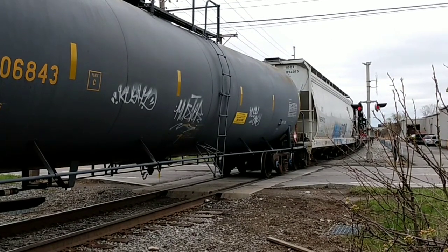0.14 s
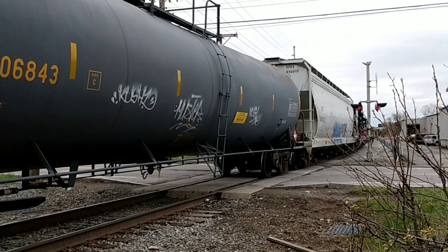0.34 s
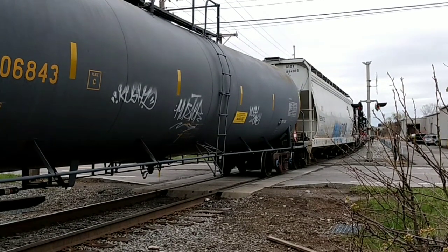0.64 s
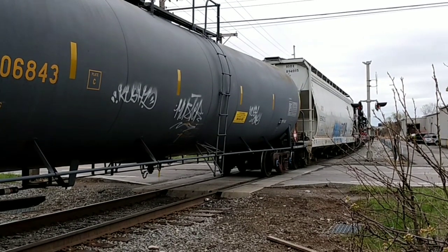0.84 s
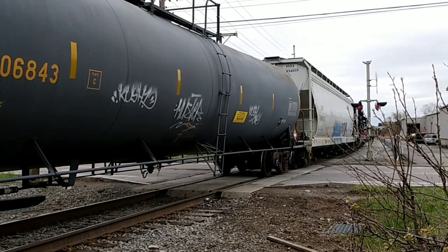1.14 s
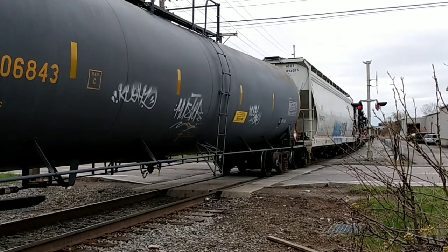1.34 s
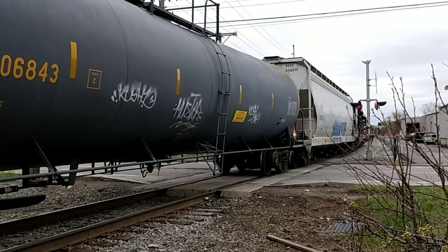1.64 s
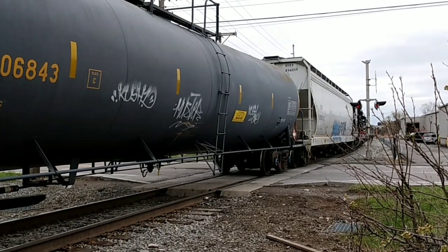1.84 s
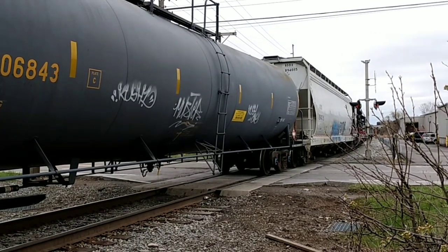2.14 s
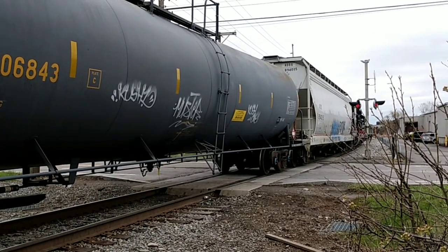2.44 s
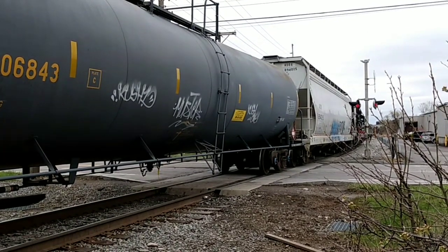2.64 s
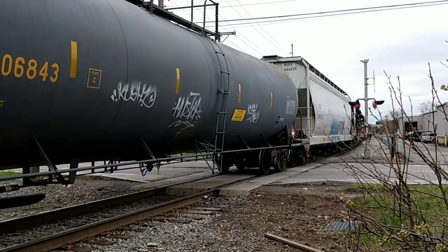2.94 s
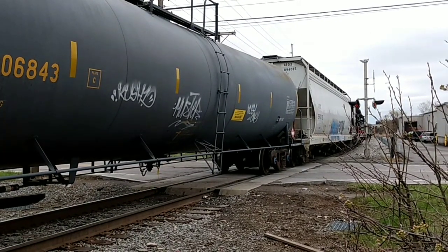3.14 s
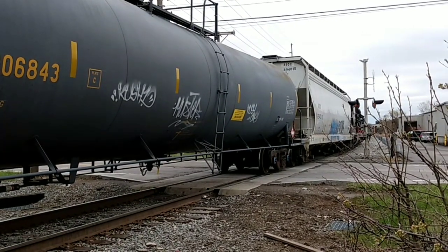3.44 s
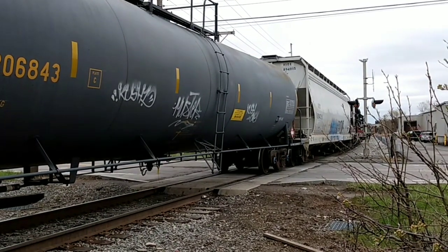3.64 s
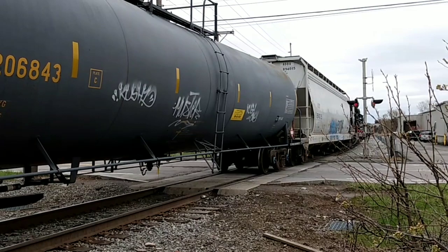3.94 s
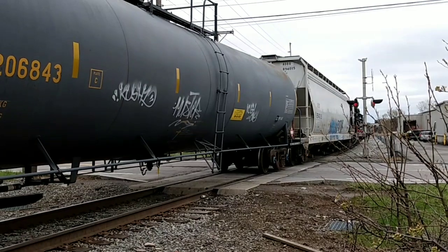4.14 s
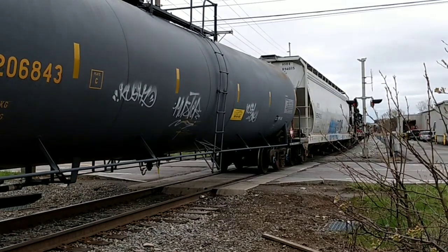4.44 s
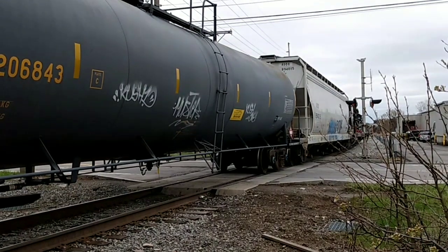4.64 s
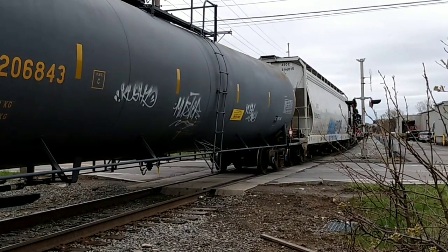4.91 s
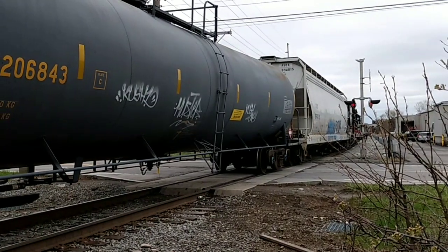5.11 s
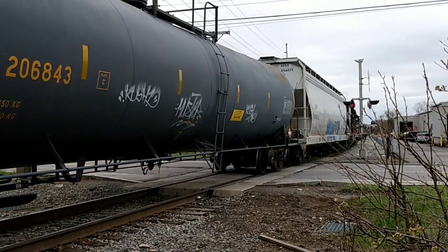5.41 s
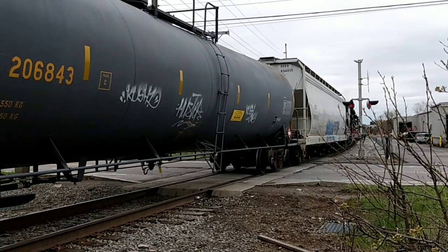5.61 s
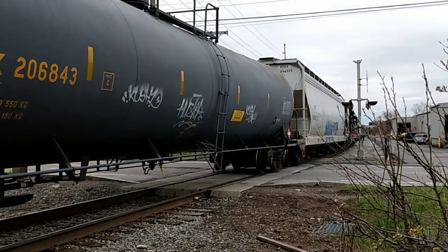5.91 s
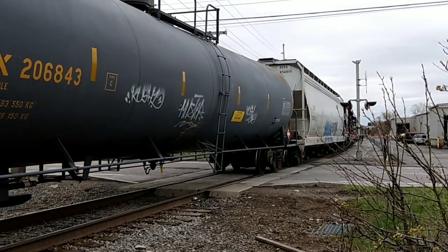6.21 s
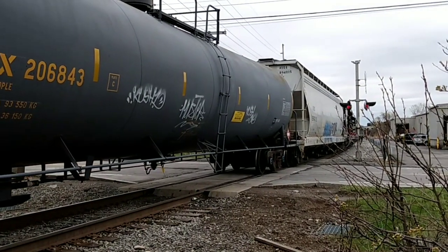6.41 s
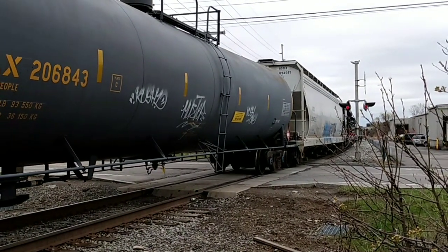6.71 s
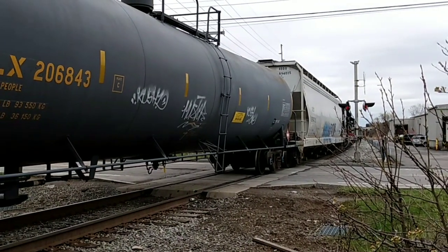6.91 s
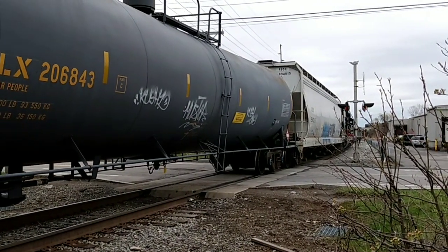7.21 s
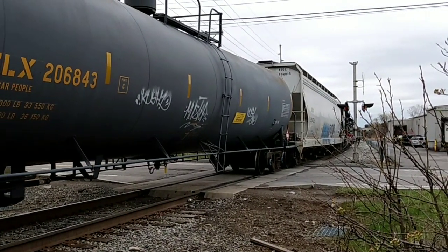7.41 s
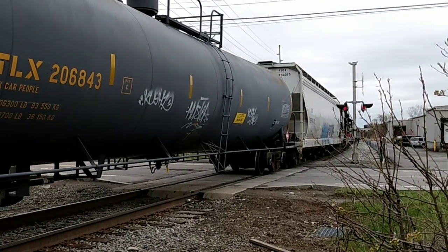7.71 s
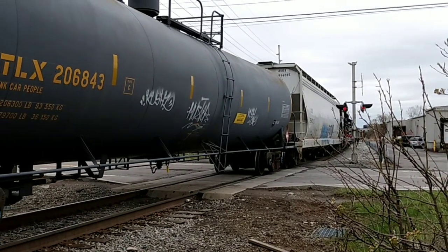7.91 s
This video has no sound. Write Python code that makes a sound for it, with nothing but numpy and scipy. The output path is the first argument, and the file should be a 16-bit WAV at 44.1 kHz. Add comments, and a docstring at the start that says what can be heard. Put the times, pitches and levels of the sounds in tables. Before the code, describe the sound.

Two bright bursts of brake air hiss one after the other and die away as a freight train prepares to move. Couplers clank and scrape, first in a short cluster, then in a louder run of metal crashes, brief squeaks, hollow booms and rumbling that echoes outdoors near the microphone. The cars settle into lighter knocks and a low roll, with a few wind puffs and a faint, wavering wheel tone.

```python
"""A freight train starts to roll beside a road crossing. First two brake valves vent in sharp, fading
hisses (0.3 s, 1.9 s) and their pipes ring on. From about 3 s the slack runs through the couplers:
steel grinds, crashes and chatters, rods clink, the empty tank booms and the yard echoes.
Crashes and rumble peak at 5-6 s. Last, among weaker jolts, wind flicks the left microphone port
and a wheel sings faintly."""
import sys
import numpy as np
from scipy import signal
from scipy.fft import rfft, irfft, next_fast_len
from scipy.io import wavfile
from scipy.ndimage import uniform_filter1d

SR = 44100
rng = np.random.default_rng(int(sys.argv[2]) if len(sys.argv) > 2 else 0)


def master_out(mix):
    """Clip the mix to full scale and print it as 16-bit PCM to the path in sys.argv[1]."""
    frames = np.transpose(np.atleast_2d(mix))
    ceiling = np.clip(frames, -1, 1)
    pcm = np.round(ceiling * 32767).astype(np.int16)
    wavfile.write(sys.argv[1], SR, pcm)


N = 355446

# brake valves: (start [s], opening [s], hiss [dB], fall [dB/s], nearly empty after [s])
VALVES = [(.256, 0.035, -19, 30.5, 1.04), (1.904, 0.036, -19.5, 32, 0.95)]
# coupler jolts: (time [s], rise [s], force [dB], car body [Hz], extra thud [dB], extra clang [dB],
# extra scrape [dB], ring time [ratio])
JOLTS = [(2.859, .11, -37, 350, -1, -2.5, 4, 0.86), (3.24, 0.052, -35.5, 337, 0, -3, -2.5, 0.77),
         (3.479, 0.035, -32, 198, -1.5, -5, -3.5, 0.78), (3.572, .025, -25.5, 163, -5, 2, -3.5, 0.72),
         (3.6, 0.08, -21.5, 170, 0.5, -0.5, 0, 1.02), (3.945, 0.053, -33, 217, 0, 3.5, 2.5, 0.71),
         (4.325, 0.014, -65.5, 300, 2, 10.5, 0, .6), (4.445, .01, -62.5, 300, -1, 7, 0, 0.68),
         (4.635, 0.023, -36, 298, -5.5, 3.5, -5, 1.1), (4.737, 0.027, -33.5, 320, 3.5, 8.5, -9, 0.65),
         (4.99, .14, -37, 246, -1.5, 2.5, -3, 2.1), (5.195, 0.066, -23.5, 210, 1, 4.5, 0, 0.95),
         (5.24, 0.072, -19, 159, -0.5, 3, -1, 1.01), (5.32, 0.053, -17.5, 165, -1.5, -3.5, 0.5, 0.89),
         (5.48, .075, -21.5, 171, 0.5, 2, -1, 1.17), (5.59, .042, -17.5, 168, -2.5, -1.5, 0, 1.05),
         (5.76, 0.044, -21.5, 187, 0, -1, 0, 1), (5.85, 0.053, -17.5, 150, -1, -0.5, 0, 0.92),
         (6.03, .04, -23, 194, 2, -1, 0.5, 1), (6.155, .02, -19.5, 166, -4, -0.5, 0.5, 0.96),
         (6.195, .018, -21, 159, -3, -6.5, 1.5, 0.82), (6.36, 0.086, -32, 190, 1.5, -2.5, -0.5, 1.24),
         (6.512, 0.11, -31, 202, -2.5, -6.5, -1.5, 1.6), (6.636, 0.038, -27.5, 210, -0.5, 1, 0, 0.98),
         (6.731, 0.057, -34, 193, 2, -8, -1.5, 1.2), (6.85, .12, -36, 195, -1, -3, -0.5, 1.16),
         (7.293, 0.022, -48.5, 197, 0.5, -4, -0.5, 0.68), (7.359, 0.011, -44.5, 227, 1.5, 4, 0.5, .8),
         (7.47, 0.022, -44, 232, -2, -3, -1.5, 0.62), (7.702, 0.0044, -49, 230, 3, -22, 1, .7),
         (8.012, 0.0083, -44, 196, -5.5, 2, -3, 1)]
# coupler castings: (mode [Hz], level [dB])
CASTING_MODES = [(2690, 1.5), (3185, 3.5), (3887, 2.5), (4436, -4), (5283, 0.5), (5997, -4), (7015, 1),
                 (7085, -3), (7490, 2.5), (8100, -14), (8590, -10), (9168, -1.5), (9760, 2), (10452, -21.5),
                 (10685, -13), (11068, 1), (11660, 9), (12145, -19), (12685, -1.5), (13010, -12),
                 (13500, -17), (14370, -13)]
# car rumble: (frequency [Hz], level [dB])
RUMBLE_SPECTRUM = [(20, -19.5), (38, -18.5), (55, -6.5), (70, 0), (84, 2.5), (105, -11.5), (150, -10.5),
                   (250, -36), (500, -57)]
# stereo image, three curves: (frequency [Hz], L-R likeness [ratio] / balance [dB] / left lead [ms])
TRAIN_PLACE = ([(100, 0.98), (400, 0.92), (1000, 0.79), (3000, 0.24), (12000, 0.16)], [(150, 1), (700, 1),
               (1600, -6.5), (2600, 7.5), (3900, -3.5), (5800, 5.5), (7300, -1), (8600, 6), (10300, 1),
               (13500, 12), (15700, -5)], [(150, .05), (500, 0.33), (1200, 0.36), (2000, 0.5006)])
FULL_FORCE_DB, STEEL_DB_PER_DB = -17, 1.593  # a full crash; growth of steel noise with force


def amp(db):
    """Decibels to gain."""
    return 10 ** (np.asarray(db) / 20)


def unit(x):
    """Scale to rms 1."""
    return x / np.sqrt(np.mean(x ** 2) + 1e-20)


def along(points, hz):
    """Interpolate (frequency [Hz], value) points on a log axis."""
    f, v = np.transpose(points)
    return np.interp(np.log(hz + 1), np.log(f + 1), v)


def curves(rows):
    """Per-sample curve of each column after the time."""
    s, *cols = np.transpose(rows)
    return [np.interp(np.arange(N) / SR, s, c) for c in cols]


def wobble(rate, size):
    """Smooth random curve over time or frequency, rate knots per SR points."""
    knots = rng.standard_normal(int(size * rate / SR) + 3)
    fine = signal.resample_poly(knots, 10, 1)
    return np.interp(np.arange(size) * (10 * rate / SR), np.arange(len(fine)), fine)


def grid(size):
    """FFT bin frequencies [Hz]."""
    return np.fft.rfftfreq(size, 1 / SR)


def noise(gain, size, place=TRAIN_PLACE):
    """Stereo noise of rms 1, shaped by a gain per bin and a stereo image."""
    hz = grid(size)
    alike, balance_db, lead_ms = (along(points, hz) for points in place)
    turn = np.arccos(np.clip(alike, -1, 1)) / 2
    mid, side = rfft(rng.standard_normal((2, size))) * gain * [np.cos(turn), np.sin(turn)]
    skew = amp(balance_db / 2) * np.exp(1j * np.pi * hz * lead_ms / 1000)
    norm = np.sqrt(abs(skew) ** 2 + abs(skew) ** -2)
    return unit(irfft(np.array([(mid + side) * skew, (mid - side) / skew]) / norm, size))


def long_noise(spectrum, place=TRAIN_PLACE):
    """Scene-length stereo noise from (frequency [Hz], level [dB]) points."""
    size = next_fast_len(N)
    return noise(amp(along(spectrum, grid(size))), size, place)[:, :N]


def ringing(modes, size, width_hz, scatter_db):
    """Ring of a steel part, each mode at a new strength."""
    mode_hz, mode_db = np.transpose(modes)
    peaks = 1 / (1 + (2 * (grid(size) - mode_hz[:, None]) / width_hz) ** 2)
    return noise(amp(mode_db + rng.normal(0, scatter_db, len(mode_db))) @ peaks, size)


def swell(t, rise_s, t60_s):
    """Linear rise, exponential decay."""
    return np.clip(t / rise_s, 0, 1) * amp(-60 * np.maximum(t - rise_s, 0) / t60_s)


def add(track, s, sound):
    """Mix a sound into a track at time s."""
    part = track[..., round(s * SR):][..., :sound.shape[-1]]
    part += sound[..., :part.shape[-1]]


def outdoors(level_db=-56):
    """Steady, low outdoor noise."""
    spectrum = [(20, -12.5), (35, -5), (62, 1), (100, -18.5), (160, -17.5), (300, -20.5), (500, -31.5),
                (800, -27.5), (1300, -39), (2100, -38.5), (3500, -48), (6000, -54), (15000, -47.5)]  # (frequency [Hz], level [dB])
    return amp(level_db) * long_noise(spectrum)


def yard_echo(x, level_db=-14):
    """Cars and sheds scatter a diffuse echo."""
    decay = [(150, 1.2), (1000, 1.1), (5000, 0.53), (14000, 1.64)]  # (frequency [Hz], t60 [s])
    hz, t, z = signal.stft(rng.standard_normal((2, 3 * SR // 2)), SR, nperseg=256)
    tail = signal.istft(z * amp(-60 * t / along(decay, hz)[:, None]), SR, nperseg=256)[1]
    return amp(level_db) * signal.fftconvolve(x, tail / np.linalg.norm(tail[0]), axes=1)[:, :N]


def wind(rise_s=0.0063, t60_s=0.45, right_db=-15):
    """Short eddies strike the left microphone port and barely reach the right."""
    puffs = [(6.643, -21.5), (6.774, -15.5), (6.844, -21), (6.93, -20), (6.985, -24), (7.134, -27),
             (7.417, -33), (7.695, -26), (7.755, -23)]  # (time [s], level [dB])
    buffet = [(25, -21), (70, 2), (180, -6), (300, -11.5), (500, -30.5), (1200, -37), (3000, -96)]  # (frequency [Hz], level [dB])
    out, size = np.zeros(N), SR // 2
    t = np.arange(size) / SR
    for s, db in puffs:
        eddy = unit(irfft(rfft(rng.standard_normal(size)) * amp(along(buffet, grid(size))), size))
        add(out, s, amp(db) * swell(t, rise_s, t60_s) * eddy)
    return out * amp([[0], [right_db]])


def wheel(waver=0.00645, flicker_db=1, rub_db=-3):
    """A flange rubs the rail; the wheel sings one unsteady note."""
    song = [(6.9, 683, -56.5), (7.2, 690, -55.5), (7.45, 700, -45.5), (7.7, 700, -50), (7.95, 692, -50),
            (8.06, 703, -62)]  # (time [s], pitch [Hz], level [dB])
    flange = [(500, -47), (640, 5.5), (770, 7.5), (880, -31), (1020, 4), (1200, -14), (1400, -2),
              (1750, -14), (1950, -24), (2150, -13), (3200, -22), (6000, -37.5)]  # (frequency [Hz], level [dB])
    hz, db = curves(song)
    phase = 2 * np.pi * np.cumsum(hz * (1 + waver * wobble(60, N))) / SR
    note = np.sin(phase) * amp(flicker_db * wobble(30, N))
    rub = amp(rub_db + 4.3 * wobble(19, N)) * long_noise(flange)
    started = np.arange(N) / SR > song[0][0]
    return started * amp(db) * (note + rub)


def rolling():
    """Heavy cars rumble over the track."""
    levels = [(0, -58), (2.4, -55.5), (3.2, -51.5), (4.25, -48), (4.45, -63), (5.15, -34), (5.33, -22),
              (6.15, -26), (6.55, -44), (7.3, -46.5), (8.06, -42.5)]  # (time [s], level [dB])
    db, = curves(levels)
    return amp(db) * long_noise(RUMBLE_SPECTRUM)


def drained_pipes(ring_db=-59, fall_db_per_s=30, waver_db=3):
    """The last air gutters through each brake pipe, stirring two sets of modes unevenly."""
    pipe_modes = [(1560, -5), (2070, 1), (2980, 4), (3820, 0.5), (6550, -0.5), (7100, -9), (9220, -7.5),
                  (10750, -4.5)]  # (mode [Hz], level [dB])
    out, size = np.zeros((2, N)), 2 * SR
    t = np.arange(size) / SR
    for s, opening_s, _, _, empty_s in VALVES:
        gate = np.clip(np.minimum(t, t[-1] - t) / opening_s, 0, 1)
        level = amp(ring_db - fall_db_per_s * np.maximum(t - empty_s, 0))
        ring = sum(amp(waver_db * wobble(22, size)) * ringing(modes, size, width_hz=173, scatter_db=1)
                   for modes in (pipe_modes[::2], pipe_modes[1::2]))
        add(out, s, gate * level * unit(ring))
    return out


def taps(rise_s=0.015, t60_s=0.15):
    """Loose knuckles touch and ring briefly without grinding."""
    touches = [(3.481, -35), (3.661, -37)]  # (time [s], level [dB])
    out, size = np.zeros((2, N)), SR // 2
    envelope = swell(np.arange(size) / SR, rise_s, t60_s)
    for s, db in touches:
        add(out, s, amp(db) * envelope * ringing(CASTING_MODES, size, width_hz=28, scatter_db=0.5))
    return out


def squeaks(rise_s=0.018, squeak_waver_hz=18, groan_waver_hz=30, rough_db=3.5):
    """Stick-slip locks onto one mode; the brake rigging groans lower, sliding in pitch."""
    slips = [(2.93, 2130, -50.5, 0.82), (3.27, 2080, -57.5, 0.33), (3.499, 11700, -42.5, .12),
             (3.661, 5900, -29, .25), (3.695, 6000, -28.5, 0.33), (3.695, 12600, -22, .1),
             (3.682, 11800, -29, .1), (3.79, 8900, -36.5, .35), (4.334, 3670, -62, 0.15),
             (4.44, 3730, -63, .15), (4.235, 2080, -61, .3), (4.45, 2080, -60, .25),
             (4.757, 12300, -37.5, .13), (4.785, 3262, -41, .16), (5.28, 11560, -28.5, .07),
             (5.372, 11650, -22.5, .07), (5.41, 14400, -25, .12), (5.765, 1325, -29.5, .15),
             (5.873, 3180, -22.5, .12), (5.88, 12900, -25, .07), (5.91, 7100, -19, .07),
             (5.925, 10800, -28.5, .35), (5.9, 5970, -31, .3), (5.61, 9830, -27.5, .25),
             (6.164, 7080, -25, .2), (6.195, 12690, -25, .25), (6.2, 10690, -26.5, .18),
             (6.201, 5960, -34, .1), (6.205, 7490, -27.5, .08)]  # (time [s], pitch [Hz], level [dB], t60 [s])
    groans = [(0.201, .1, 844, 830, -66.5), (1.19, .12, 750, 753, -58), (3.041, 0.3, 900, 840, -54),
              (3.392, .15, 900, 605, -47.5), (7.291, 0.3, 339, 325, -41)]  # (time [s], length [s], start [Hz], end [Hz], level [dB])
    out, size = np.zeros(N), SR // 2
    t = np.arange(size) / SR

    def rough_tone(hz):
        return unit(np.sin(2 * np.pi * np.cumsum(hz) / SR) * amp(rough_db * wobble(110, size)))

    for s, hz, db, t60_s in slips:
        squeak = rough_tone(hz + squeak_waver_hz * wobble(150, size)) / np.sqrt(2)
        add(out, s, amp(db) * swell(t, rise_s, t60_s) * squeak)
    for s, length_s, start_hz, end_hz, db in groans:
        progress = np.clip(t / length_s, 0, 1)
        hz = start_hz + (end_hz - start_hz) * progress + groan_waver_hz * wobble(200, size)
        add(out, s, amp(db) * np.sin(np.pi * progress) * rough_tone(hz))
    return out


def knocks(rise_s=0.006, t60_s=0.2, width_oct=0.4, ripple_db=5, rattle_db=2):
    """Levers and side frames knock dryly, each in a cluster of modes around its own pitch."""
    hits = [(.405, 700, -58), (.62, 1250, -56), (.655, 780, -58.5), (.76, 1150, -58), (.86, 700, -64),
            (1.105, 720, -58), (2.92, 380, -42), (3.275, 480, -38), (3.655, 1800, -26), (3.71, 550, -24),
            (3.985, 750, -32), (4.04, 380, -37), (4.335, 1300, -59), (4.405, 652, -60), (4.448, 1800, -58),
            (4.612, 2400, -41), (4.68, 416, -38), (5.08, 1200, -47), (5.275, 476, -24), (5.355, 4000, -26),
            (5.618, 11000, -25), (5.715, 300, -18), (5.885, 12500, -24), (5.918, 7500, -25),
            (6.208, 12000, -24), (6.3, 450, -33), (6.55, 380, -35), (6.97, 380, -35), (7.294, 3000, -48),
            (7.362, 1000, -40), (7.385, 3100, -55), (7.43, 190, -39), (7.5, 1003, -49), (7.569, 1700, -49),
            (7.645, 1350, -53), (7.703, 480, -36), (7.729, 3500, -61.5), (7.78, 307, -33),
            (7.82, 1300, -49), (8.01, 3970, -51)]  # (time [s], pitch [Hz], level [dB])
    out, size = np.zeros((2, N)), SR // 2
    t, hz = np.arange(size) / SR, grid(size)
    for s, part_hz, db in hits:
        offset_oct = np.log2((hz + 1) / part_hz)
        cluster = amp(ripple_db * wobble(1400, len(hz))) / (1 + (offset_oct / width_oct) ** 4)
        envelope = amp(db + rattle_db * wobble(94, size)) * swell(t, rise_s, t60_s)
        add(out, s, envelope * noise(cluster, size))
    return out


def rods(rise_s=0.01, t60_s=0.24, ring_t60_s=0.27, ring_db=-4, ripple_db=4.5, detune=0.0252):
    """Loose brake rods and chains snap taut: a crowd of high modes, a few ringing longer."""
    clinks = [(3.574, -12.5, -1), (4.106, -33.5, 3.5), (4.566, -32, -0.5), (4.645, -38, -9),
              (4.758, -31, -5.5), (4.959, -36, -1), (5.188, -29.5, -3), (6.55, -38, -5), (6.765, -41, 0),
              (7.294, -50, -7.5), (7.36, -46.5, 8), (7.476, -46, 8), (7.584, -59, -1), (7.722, -58.5, 7),
              (7.862, -33.5, 0.5), (7.985, -41, 2)]  # (time [s], level [dB], tilt [dB/octave])
    spectrum = [(500, -12), (1500, -3.5), (2800, -8.5), (3800, -10.5), (5300, -4.5), (6700, -1),
                (8600, -6.5), (9400, 3.5), (11000, -1), (12500, 0.5), (14500, -4.5), (15700, 1.5)]  # (frequency [Hz], level [dB])
    rod_modes = [(1700, -1), (3260, -3), (3850, -6.5), (5900, -6), (6700, 1), (7876, -1), (9259, -5.5),
                 (10080, -2), (10790, 3), (11280, -3), (12130, -0.5), (12540, 7), (13000, -1), (14300, 6.5),
                 (15200, 0)]  # (mode [Hz], level [dB])
    out, size = np.zeros((2, N)), SR // 2
    t, hz = np.arange(size) / SR, grid(size)
    for s, db, tilt_db_per_oct in clinks:
        crowd = noise(amp(along(spectrum, hz) + ripple_db * wobble(550, len(hz))), size)
        this_rod = [(f * (1 + detune * rng.standard_normal()), level) for f, level in rod_modes]
        ring = ringing(this_rod, size, width_hz=90, scatter_db=3.5)
        tilt = amp(tilt_db_per_oct * np.log2(np.maximum(hz, 1500) / 8000))
        crowd, ring = (unit(irfft(rfft(x) * tilt, size)) for x in (crowd, ring))
        add(out, s, amp(db) * swell(t, rise_s, t60_s) * crowd)
        add(out, s, amp(db + ring_db) * swell(t, rise_s, ring_t60_s) * ring)
    return out


def tank(rise_s=0.0056, t60_cycles=17, overtone_ratio=1.9, overtone_db=-8):
    """The hollow shell booms in a low mode and a shorter, higher one; deeper booms last longer."""
    booms = [(2.505, -30, 77.5), (2.59, -30, 62), (3.055, -35, 79), (3.148, -31, 69), (3.27, -30.5, 328),
             (3.486, -32, 203), (3.605, -21, 186), (3.67, -24, 85), (4.138, -31.5, 91.3),
             (4.25, -32.5, 74.5), (4.655, -35, 283), (4.8, -26, 74), (4.963, -24.5, 76),
             (5.048, -21.5, 72.4), (5.31, -17.5, 88), (5.345, -16.5, 235), (5.385, -14, 83),
             (5.67, -12.5, 131), (5.812, -12.5, 192), (5.905, -18, 174), (6.053, -9, 170),
             (6.061, -21.5, 323), (5.925, -20.5, 490), (7.7, -36, 228), (7.703, -38, 530)]  # (time [s], level [dB], low mode [Hz])
    out, t = np.zeros(N), np.arange(SR // 2) / SR
    for s, db, hz in booms:
        phase, t60_s = 2 * np.pi * hz * t, t60_cycles / hz
        low = swell(t, rise_s, t60_s) * np.sin(phase)
        high = amp(overtone_db) * swell(t, rise_s, t60_s / 2) * np.sin(overtone_ratio * phase)
        add(out, s, amp(db) * (low + high))
    return out


def vent(valve, jet, port, pipe_hold, pipe_db, flutter_db, ripple_db, edge_db):
    """A jet hisses through a valve port; as pressure falls it turns dull and hollow."""
    # stereo image, three curves: (frequency [Hz], L-R likeness [ratio] / balance [dB] / left lead [ms])
    place = ([(200, 1), (2000, 0.62), (6000, 0.56), (14000, 0.29)], [(600, 6), (1150, -14), (1700, -9),
             (2700, 3.5), (4000, 0), (7500, -2.5), (11000, -1), (15000, -2.5)], [(300, -0.033),
             (1000, -0.14), (3500, -0.1), (7000, -0.12)])
    surges = [(0.272, 1), (0.3, 3.5), (2.099, 5.5), (2.165, 3)]  # (time [s], boost [dB])
    jet_edge = [(400, -26), (800, -15.5), (1150, 4.5), (1500, -4.5), (2200, -30)]  # wavering low edge of the jet: (frequency [Hz], level [dB])
    sag_db_per_s2, collapse_db_per_s, surge_s = 15, 92.5, 0.0096
    s, opening_s, hiss_db, fall_db_per_s, empty_s = valve
    size = next_fast_len(N)
    t, hz = np.arange(N) / SR, grid(size)
    age_s = np.maximum(t - s, 0)

    def jet_noise(ripple_rate, power):
        # reflections under the car carve a fine spectral ripple
        colour = amp(along(jet, hz) + ripple_db * wobble(ripple_rate, len(hz)))
        return noise(colour * np.sqrt(power), size, place)[:, :N]

    resonance = sum(amp(db) ** 2 / (1 + (2 * (hz - f) / width) ** 2) for f, width, db in port)
    air = jet_noise(1800, 1 + resonance)
    pipe = jet_noise(900, (0.061 + resonance) / (1 + (hz / 4600) ** 12))
    spent_db = -fall_db_per_s * age_s - sag_db_per_s2 * age_s * (age_s - empty_s)
    spent_db -= collapse_db_per_s * np.maximum(age_s - empty_s, 0)
    surge_db = sum(db * np.exp(-((t - at) / surge_s) ** 2) for at, db in surges)
    gate = np.sin(np.pi / 2 * np.clip(age_s / opening_s, 0, 1)) ** 2
    edge = amp(edge_db + 3.2 * wobble(16, N)) * long_noise(jet_edge, place)
    # low pipe resonances outlast the jet: pipe_hold is the share of the fall they escape
    hollow = amp(pipe_db - pipe_hold * spent_db - 0.56 * wobble(4.8, N)) * pipe
    level = amp(hiss_db + spent_db + surge_db + flutter_db * wobble(41, N))
    return gate * level * (air + hollow + edge)


def brake_valves():
    """Two valves vent in turn, each with its own jet and port."""
    # jet spectra: (frequency [Hz], level [dB])
    first_jet = [(500, -49), (850, -47), (1600, -23), (3200, -20), (5800, -11), (7300, -3.5), (8000, -7.5),
                 (8800, 2.5), (10300, -0.5), (11600, 1.5), (12800, -3), (14300, -5), (15700, -10)]
    second_jet = [(500, -36), (800, -43), (1100, -23.5), (1800, -10.5), (3000, -4.5), (4200, -6.5),
                  (5500, -3), (6700, 1), (8400, 0), (10200, 1.5), (11800, 4.5), (13300, -3), (15700, 0)]
    # port resonances: (frequency [Hz], width [Hz], level [dB])
    first_port = [(1730, 260, -19.5), (2026, 200, -12.5), (3200, 250, -12), (3700, 200, -19.5),
                  (7200, 260, -3.5), (9500, 220, -6), (10280, 240, 8), (11690, 160, -3)]
    second_port = [(1740, 190, 1), (4160, 200, -11.5), (7520, 240, 6), (9900, 900, 0)]
    first = vent(VALVES[0], first_jet, first_port,
                 pipe_hold=0.54, pipe_db=-16, flutter_db=0.5, ripple_db=3, edge_db=-38)
    second = vent(VALVES[1], second_jet, second_port,
                  pipe_hold=0.4, pipe_db=-16.5, flutter_db=0.7, ripple_db=4, edge_db=-27.5)
    return first + second


def chatter(count=14, from_db=-25, ping_db=-10.5, scatter_db=2, pan_db=3, detune=0.015):
    """Knuckles chatter at the height of a hard jolt; each contact pings one casting mode."""
    out, t = np.zeros((2, N)), np.arange(SR // 5) / SR
    envelope = swell(t, rise_s=0.0022, t60_s=0.1)
    for s, rise_s, force_db, *_ in JOLTS:
        chance, spread = rng.random((count, 4)), rng.standard_normal((count, 3))
        if force_db < from_db:
            continue
        mean_db = FULL_FORCE_DB + STEEL_DB_PER_DB * (force_db - FULL_FORCE_DB) + ping_db
        for (when, which, *phases), (strength, pan, off) in zip(chance, spread):
            hz = CASTING_MODES[int(which * len(CASTING_MODES))][0] * (1 + detune * off)
            db = mean_db + scatter_db * strength + pan_db * pan * np.array([[1], [-1]])
            ping = envelope * np.sin(2 * np.pi * (hz * t + np.array(phases)[:, None]))
            add(out, s + rise_s * (0.5 + when), amp(db) * ping)
    return out


def spectral_flicker(x, depth_db=2):
    """Brief random patches of the crash spectrum swell and fade, giving a slight warble."""
    z = signal.stft(x, nperseg=1024)[2]
    patches = uniform_filter1d(rng.standard_normal(z.shape[1:]), size=4, axis=0)
    patches = uniform_filter1d(patches, size=5, axis=1)
    warbled = signal.istft(z * amp(depth_db * unit(patches)), nperseg=1024)[1][:, :N]
    return unit(warbled) * np.sqrt(np.mean(x ** 2))


def couplers():
    """Each jolt grinds steel in stick-slip and shakes body, frame and castings; harder is brighter."""
    # spectra of the shaken parts: (frequency [Hz], level [dB])
    body_spectrum = [(60, -42), (110, -6), (175, 0.5), (260, -3), (340, -4.5), (480, -12), (800, -18),
                     (2000, -76.5)]
    frame_spectrum = [(200, -55.5), (400, -10.5), (540, -1), (750, -0.5), (1050, 0), (1350, -3.5),
                      (1850, -6), (2300, -13), (3000, -12), (6000, -31.5)]
    steel_spectrum = [(1500, -36.5), (2500, -3.5), (3200, -0.5), (4300, 3.5), (5000, 0.5), (7200, 0),
                      (8300, -2), (10200, 3), (11800, 0.5), (14300, -1.5), (15700, -7)]
    body_t60_s, frame_t60_s, steel_t60_s = 0.81, 0.67, 0.7
    body_db, heave_db, frame_db, steel_db, casting_db = 0.94, -13, 1.05, -0.5, -7
    body_hz, clang_hz, dull_hz = 175, 1980, 6000
    arrival_s, far_db_per_s = 3.527, 46  # treble is lost until the run of slack draws near
    out, size = np.zeros((2, N)), 25600
    t, hz = np.arange(size) / SR, grid(size)

    def shaken(db, ripple_db=3.2):
        return noise(amp(db + ripple_db * wobble(752, len(hz))), size)

    for s, rise_s, force_db, car_hz, thud_db, clang_db, scrape_db, sustain in JOLTS:
        over_db = force_db - FULL_FORCE_DB
        far_db = far_db_per_s * max(arrival_s - s, 0)
        judder = amp(0.5 * (wobble(131.6, size) - 1.12))
        body = amp(body_db) * shaken(along(body_spectrum, hz * body_hz / car_hz))
        body += amp(heave_db) * shaken(along(RUMBLE_SPECTRUM, hz))
        thud = amp(over_db + thud_db) * swell(t, rise_s, body_t60_s * sustain) * body
        bright_db = (7 + 0.52 * over_db) * np.minimum(hz / clang_hz, 1)
        frame = shaken(along(frame_spectrum, hz) + bright_db - far_db * np.minimum(hz / dull_hz, 1))
        clang = amp(over_db + frame_db + clang_db) * swell(t, rise_s, frame_t60_s * sustain) * frame
        steel = judder * shaken(along(steel_spectrum, hz))
        steel += amp(casting_db) * ringing(CASTING_MODES, size, width_hz=26, scatter_db=5.5)
        scrape_gain = amp(STEEL_DB_PER_DB * over_db + steel_db + scrape_db - far_db)
        scrape = scrape_gain * swell(t, rise_s, steel_t60_s * sustain) * steel
        add(out, s, amp(FULL_FORCE_DB) * (judder * (thud + clang) + scrape))
    return out


def scene():
    """Valves, running gear and weather; only the gear echoes."""
    air = brake_valves()
    gear = spectral_flicker(couplers()) + chatter() + taps() + knocks() + squeaks() + rods() + tank()
    return outdoors() + air + drained_pipes() + gear + yard_echo(gear) + rolling() + wheel() + wind()


def record(dry, ceiling=0.6, top_hz=15780):
    """Soft peak limit, then a steep low-pass."""
    rounded = dry / (1 + (dry / ceiling) ** 6) ** (1 / 6)
    size = next_fast_len(N + SR // 2)
    return irfft(rfft(rounded, size) / np.sqrt(1 + (grid(size) / top_hz) ** 600), size)[:, :N]


dry = scene()
out = record(dry)
master_out(out)
```